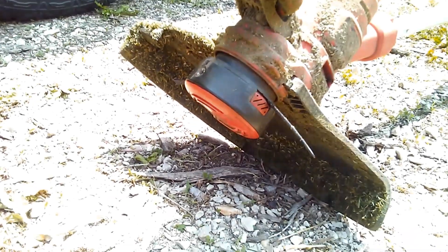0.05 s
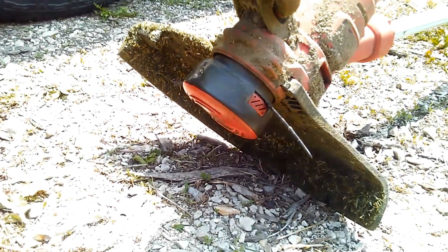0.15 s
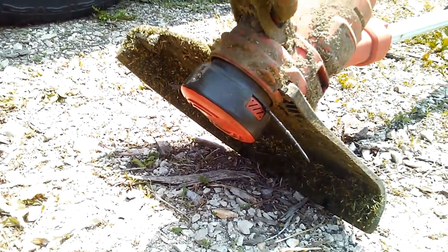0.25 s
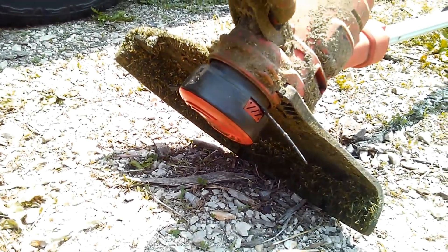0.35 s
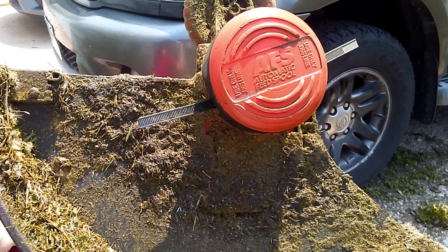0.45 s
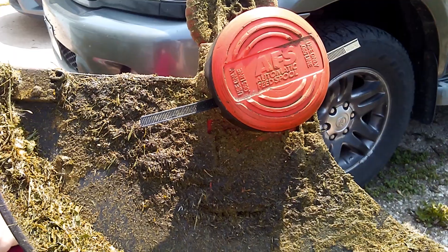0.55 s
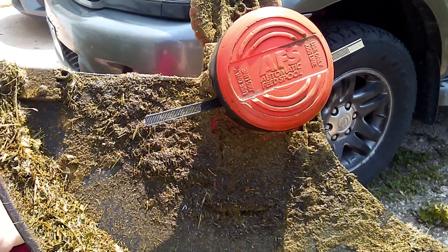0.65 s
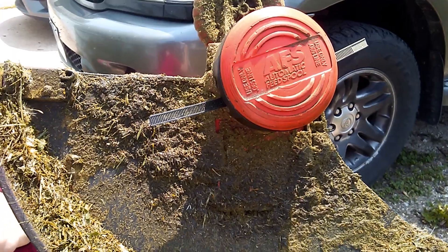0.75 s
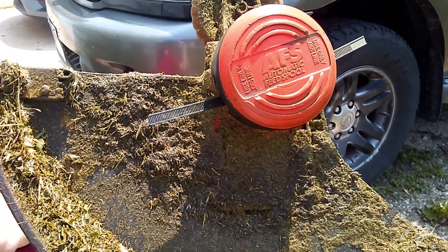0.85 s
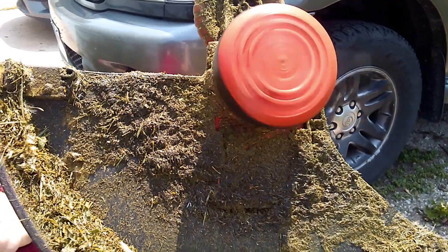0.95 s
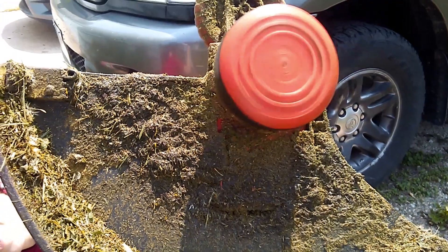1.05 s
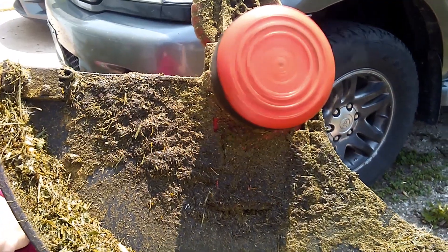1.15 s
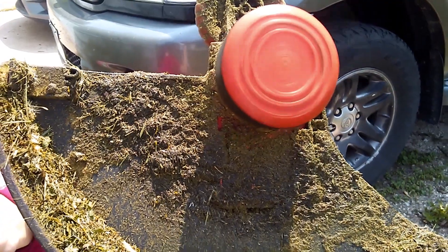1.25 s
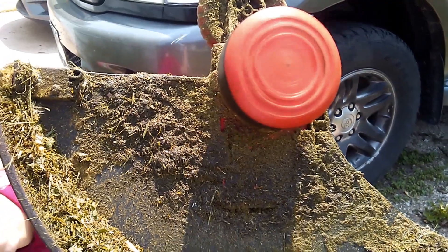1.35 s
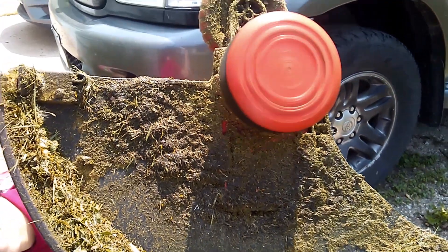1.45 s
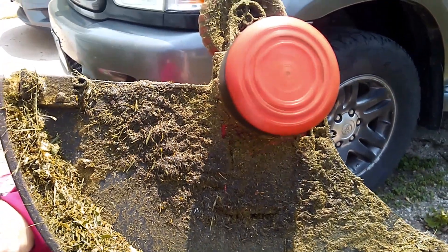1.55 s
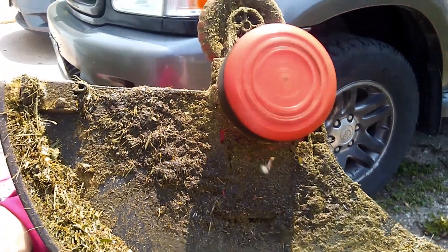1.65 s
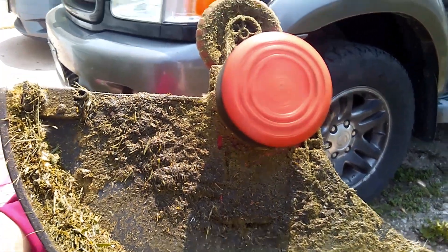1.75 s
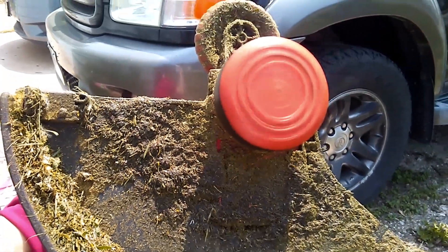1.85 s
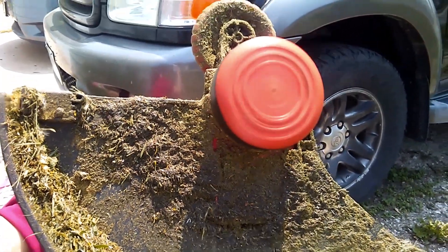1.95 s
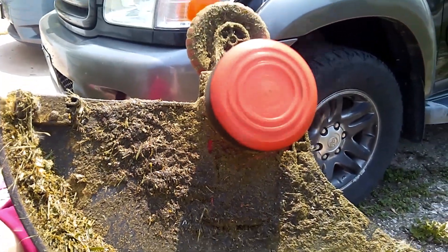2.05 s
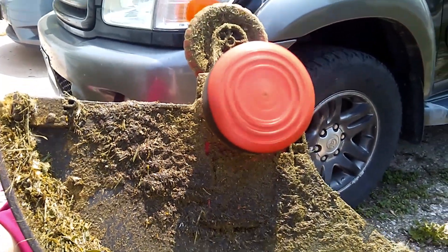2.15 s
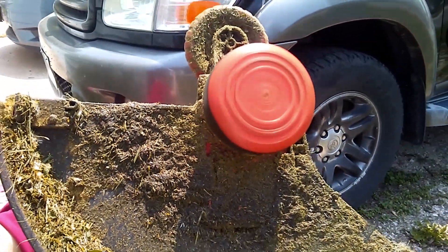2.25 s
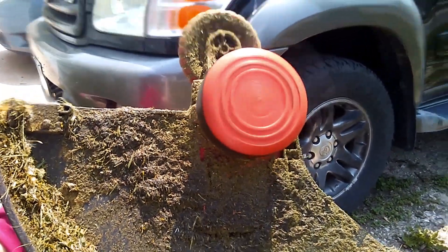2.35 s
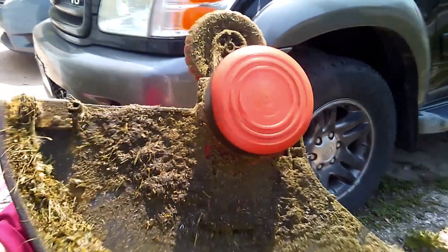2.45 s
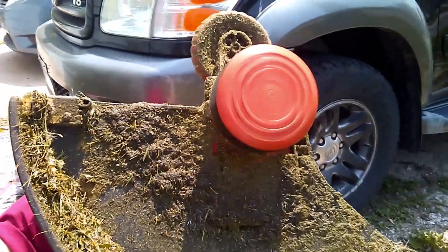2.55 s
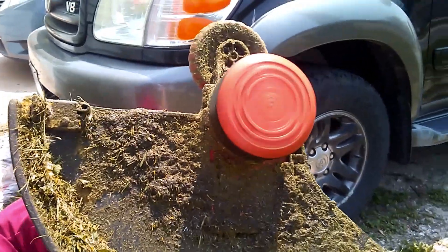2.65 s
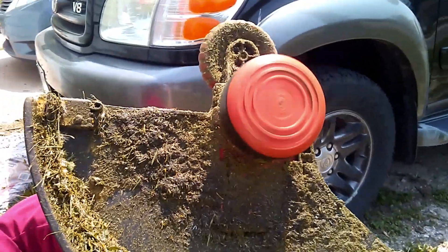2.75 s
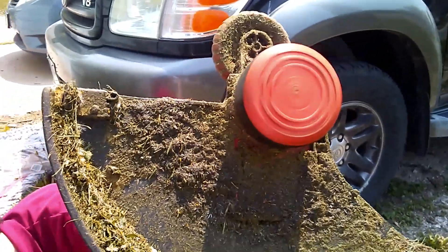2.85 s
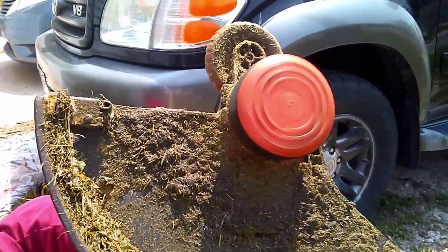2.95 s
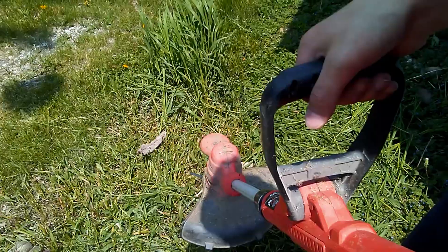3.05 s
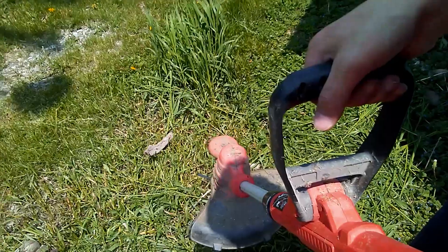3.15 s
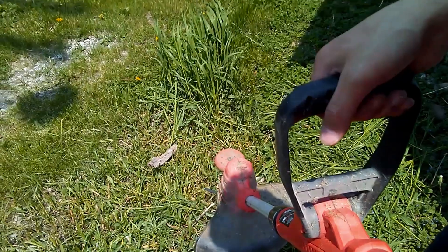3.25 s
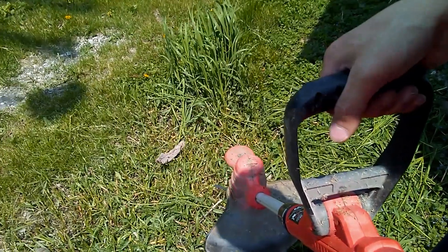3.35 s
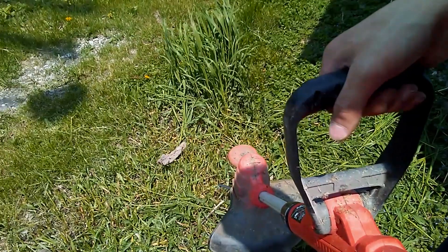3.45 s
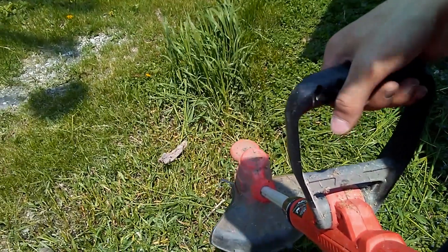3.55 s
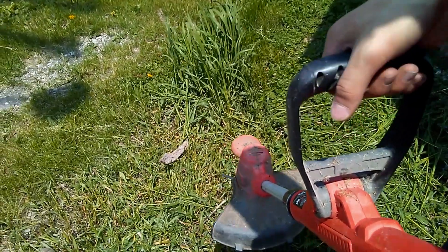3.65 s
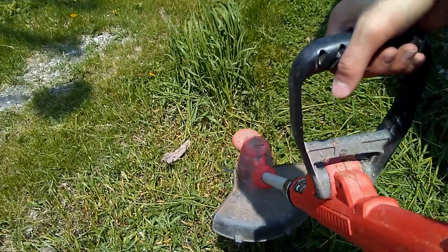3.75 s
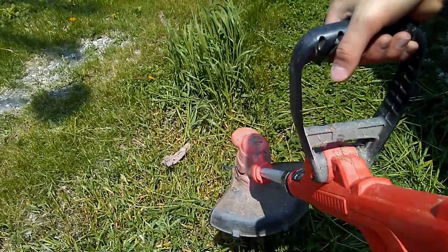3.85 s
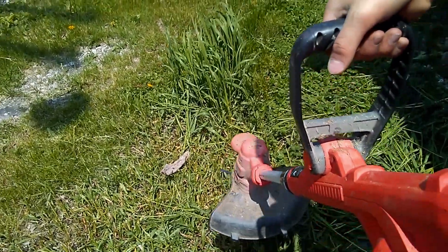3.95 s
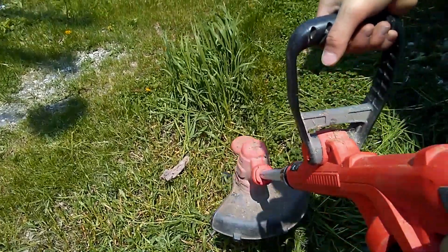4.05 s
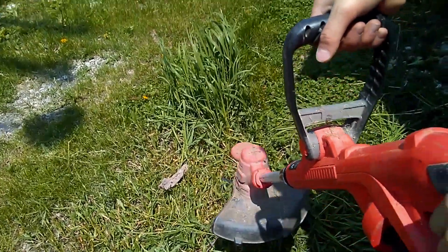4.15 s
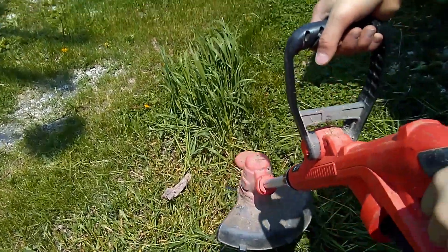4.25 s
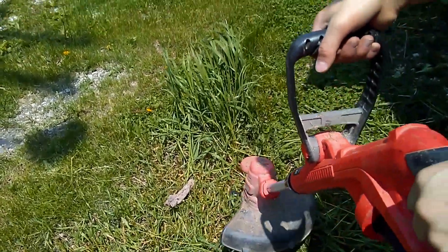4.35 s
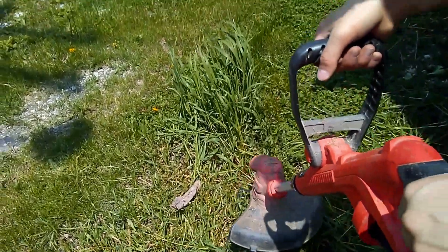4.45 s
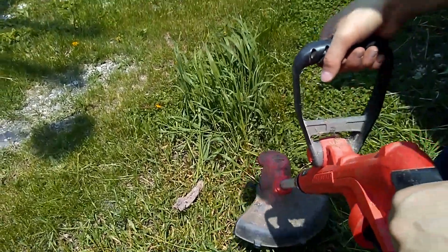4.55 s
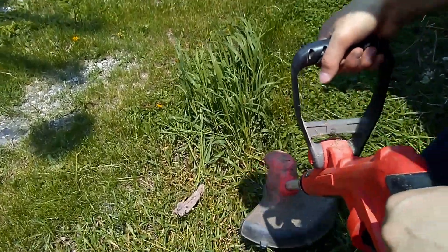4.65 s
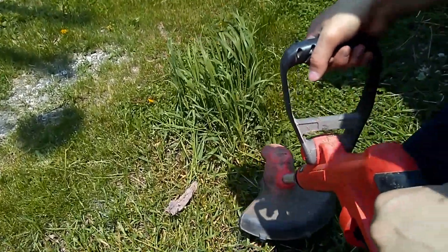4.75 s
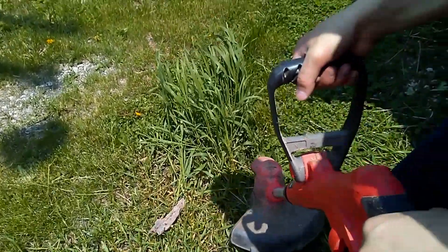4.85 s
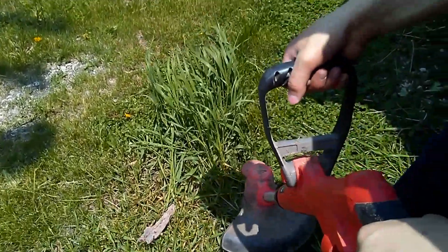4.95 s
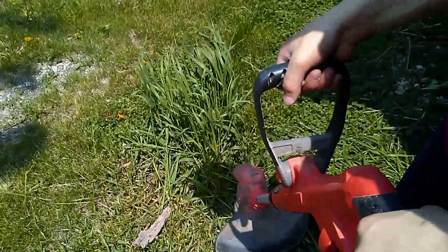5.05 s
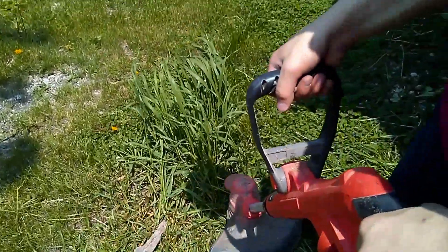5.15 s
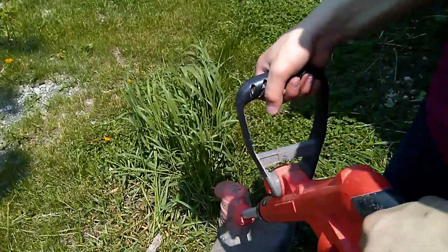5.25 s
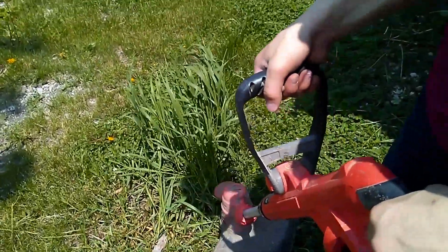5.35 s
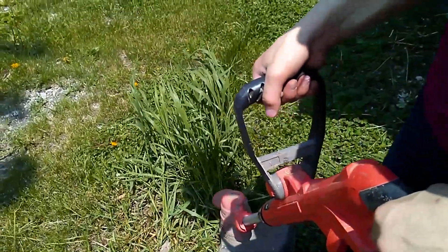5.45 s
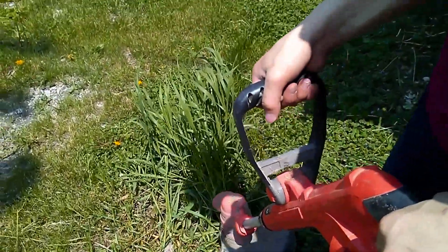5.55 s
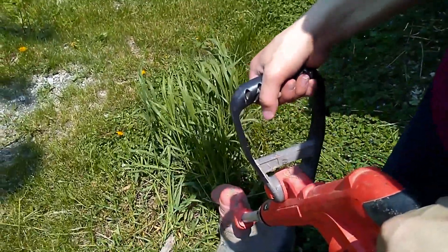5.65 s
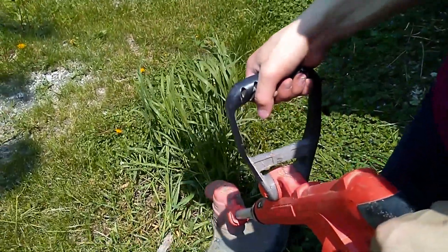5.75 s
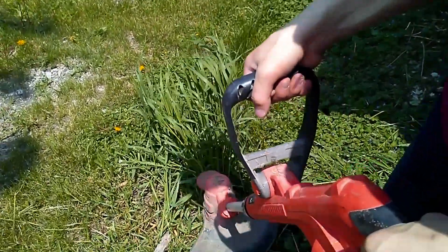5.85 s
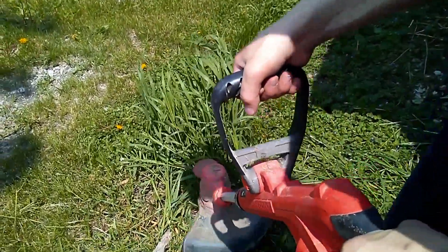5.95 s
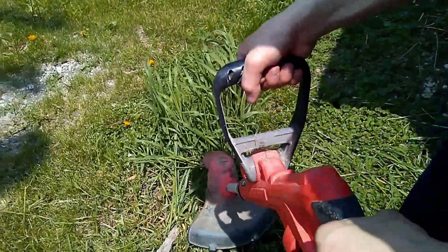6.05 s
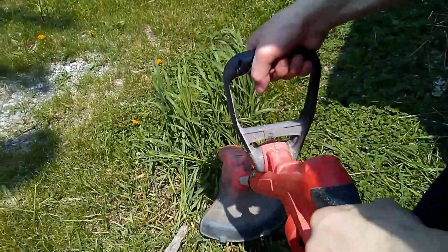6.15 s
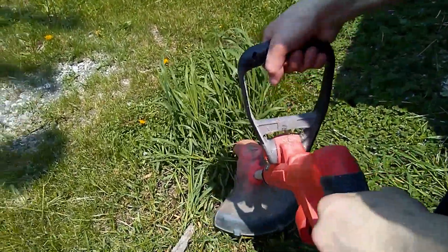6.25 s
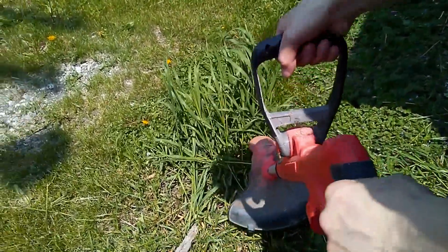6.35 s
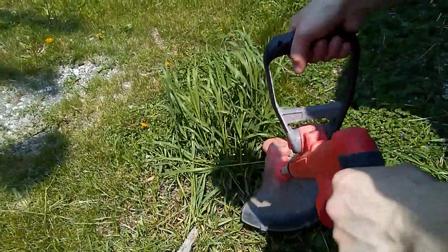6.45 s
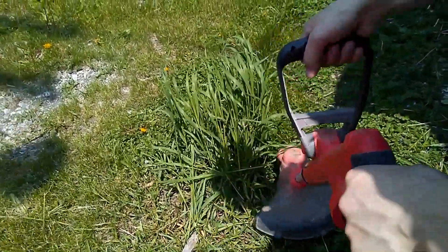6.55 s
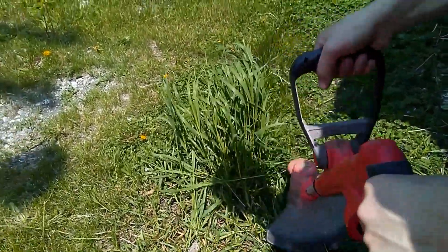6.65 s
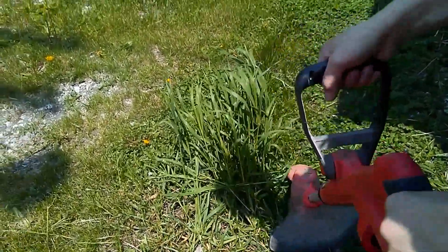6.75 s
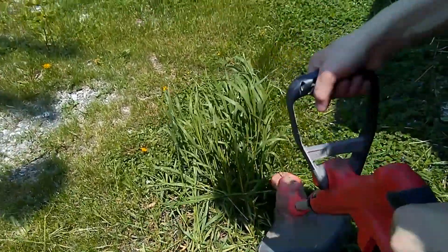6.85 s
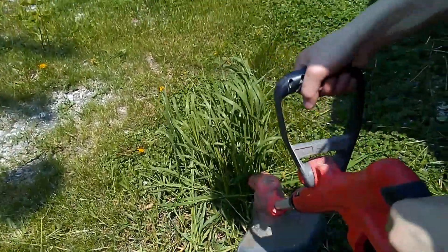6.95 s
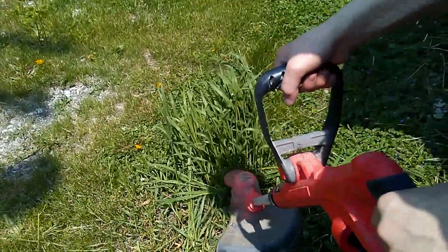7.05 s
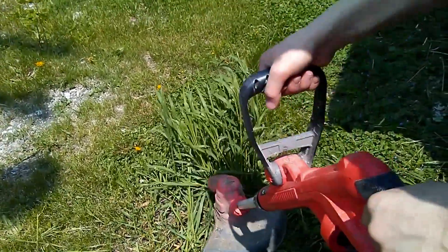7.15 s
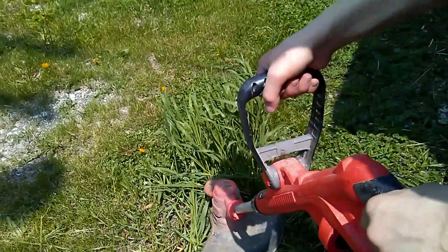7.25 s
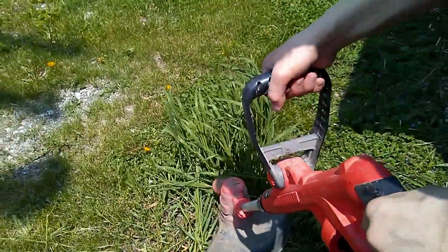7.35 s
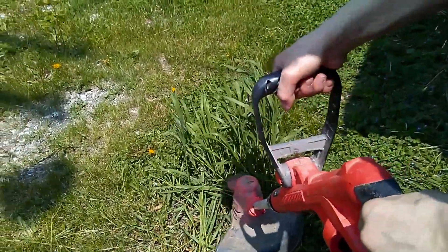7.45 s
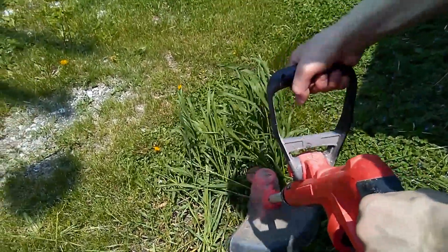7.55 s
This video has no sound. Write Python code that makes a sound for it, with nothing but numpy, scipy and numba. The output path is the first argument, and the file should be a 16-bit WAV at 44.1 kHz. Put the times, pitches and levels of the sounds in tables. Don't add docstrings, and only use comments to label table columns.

```python
import sys
import numpy as np
from scipy import signal
from scipy.fft import rfft, irfft, next_fast_len
from scipy.io import wavfile
from scipy.ndimage import uniform_filter1d, minimum_filter1d
from numba import njit

SR = 44100
rng = np.random.default_rng(int(sys.argv[2]) if len(sys.argv) > 2 else 0)


def master(y):
    cut = np.clip(np.atleast_2d(y).T, -1, 1)
    pcm = np.round(cut * 32767)
    wavfile.write(sys.argv[1], SR, pcm.astype(np.int16))


def voltage_ratio(decibels):
    exponent = np.asarray(decibels, float) / 20
    return 10 ** exponent


N = 335390
T = np.arange(N) / SR
PORT_EDGE = signal.ellip(9, .3, 70, 4220, fs=SR, output="sos")


def port(x):
    return signal.sosfilt(PORT_EDGE, x)


def unit(x):
    return x / np.sqrt(np.mean(x ** 2))


def shape_db(points, hz):
    f, db = np.transpose(points)
    return np.interp(np.log(hz + 1), np.log(f), db)


def coloured(points):
    size = next_fast_len(N)
    hz = np.arange(size // 2 + 1) * SR / size
    inside = (hz > points[0][0]) & (hz < points[-1][0])
    spectrum = rfft(rng.standard_normal(size)) * voltage_ratio(shape_db(points, hz)) * inside
    return unit(irfft(spectrum, size)[:N])


@njit
def svf(x, hz, width_hz):
    y, b, l = np.empty(len(x)), 0., 0.
    for i in range(len(x)):
        g, k = np.tan(np.pi * hz[i] / SR), width_hz / hz[i]
        v = (b + g * (x[i] - l)) / (1 + g * (g + k))
        b, l, y[i] = 2 * v - b, l + 2 * g * v, k * v
    return y


def band(x, hz, width_hz):
    hz = uniform_filter1d(hz + 0 * T, size=4096)
    return svf(svf(x, hz, width_hz), hz, width_hz)


def walk(rate):
    k = int(SR / rate)
    held = np.repeat(rng.standard_normal(N // k + 1), k)
    return 1.57 * uniform_filter1d(uniform_filter1d(held, k), k)[:N]


def echo(x, lag_s, share):
    return x + share * np.interp(T - lag_s, T, x)


def ring(hz, t60_s, t):
    return np.sin(2 * np.pi * hz * t) * np.exp(-np.log(1000) * t / t60_s)


def window(start_s, end_s, rise_s, fall_s):
    return np.clip((T - start_s) / rise_s, 0, 1) * np.clip((end_s - T) / fall_s, 0, 1)


FULL_SPEED_TURNS_PER_S = 160
SAG_S, SAG_WIDTH_S, SAG_SHARE = 6.9, 0.307, 0.0088


def shaft(s, turns_per_s):
    speed = np.exp(np.interp(T, s, np.log(turns_per_s)))
    speed = speed * (1 - SAG_SHARE * np.exp(-((T - SAG_S) / SAG_WIDTH_S) ** 2))
    gain = uniform_filter1d(np.gradient(speed) * SR, size=4096) / speed
    turns = np.cumsum(speed * (1 + 0.0017 * walk(rate=30))) / SR
    return speed, gain, turns


# f/Hz, level/dB
NEAR_WHIRR = [(90, -52.5), (160, -18.5), (300, -14), (500, -5.5), (700, -8), (1170, -1.5), (1500, -3.5),
              (2000, -2), (2700, -1.5), (3300, -4), (3900, -7), (4300, -14.5), (4800, -30)]
FAR_WHIRR = [(90, -47.5), (160, -29), (300, -19), (500, -7), (900, -12), (1250, -3), (1800, -2),
             (2500, -0.5), (3000, -9), (3700, -9.5), (4100, -15), (4400, -29.5), (4800, -35.5)]
SWISH, SWISH_PER_GAIN = (0.13, 0.099), (.06, .05)
GUARD_SHARE, FACING_VENT_DB = (0.44, .6), 6.5


def air_whirr(take, turns, gain, guard_hz, vent, lag_s, buried):
    swish = SWISH[take] + SWISH_PER_GAIN[take] * np.clip(gain, 0, 4)
    gate = np.exp(swish * np.cos(2 * np.pi * turns))
    gate = gate / np.sqrt(uniform_filter1d(gate ** 2, size=2048))
    whirr = coloured((NEAR_WHIRR, FAR_WHIRR)[take])
    whirr = whirr + GUARD_SHARE[take] * band(whirr, guard_hz, 1100)
    vent_gain = voltage_ratio(FACING_VENT_DB * vent + 1.1 * walk(rate=9))
    whirr = whirr + (vent_gain - 1) * band(whirr, 3506.5, 1500)
    whirr = unit(echo(whirr, lag_s, 0.26))
    whirr = port(whirr * gate * voltage_ratio(.6 * walk(rate=25)))
    whirr = signal.sosfilt(signal.butter(4, 110, "high", fs=SR, output="sos"), whirr)
    return whirr + 1.44 * (1 - buried) * band(whirr, 440, 450)


# f/Hz, level/dB
HOUSING = [(60, -49), (100, -25), (160, -17.5), (230, -7), (320, -2), (400, -1.5), (540, 2.5), (700, -9.5),
           (950, 3), (1250, 3), (1560, -3), (1750, -3.5), (4000, -7.5), (4500, -39)]


def lines(turns, speed, orders, levels_db, wobble_db):
    out = 0
    for k, db in zip(orders, levels_db):
        db = db + shape_db(HOUSING, k * speed) + wobble_db * np.sqrt(k) * walk(rate=14)
        out = out + voltage_ratio(db) * np.sqrt(2) * np.sin(2 * np.pi * (k * turns + rng.random()))
    return out


GEAR = 3.63
HEAD_ORDERS, MOTOR_ORDERS = (1, 2, 3, 4, 6), (1, 2)
HEAD_DB = [
    (-5, -10, -20, -11.5, -18.5),
    (-16.5, -12.5, -25, -8.5, -32),
]
MOTOR_DB = [
    (-14, -18.5),
    (-12.5, -23),
]
TONE_DB, TONE_DB_PER_GAIN, COAST_TONE_DB_PER_S = (2.5, 1.05), (2.5, 1.8), -4.5
START_BURIED_DB, START_GAIN = (0.3, -7), 1.6


def shaft_tones(take, turns, speed, gain, coast_s, buried):
    db = TONE_DB[take] + TONE_DB_PER_GAIN[take] * np.clip(gain, -1, 3)
    db = db + COAST_TONE_DB_PER_S * coast_s
    db = db + START_BURIED_DB[take] * np.clip(gain - START_GAIN, 0, None)
    head = lines(turns, speed, HEAD_ORDERS, HEAD_DB[take], 0.6)
    motor = lines(GEAR * turns, GEAR * speed, MOTOR_ORDERS, MOTOR_DB[take], 0.86)
    return voltage_ratio(db) * buried * (head + motor)


MOTOR_POLES = 3
# f/Hz, level/dB
WHINE = [(900, -29.5), (1230, -25), (1400, -25), (1500, -26), (1600, -34), (1680, -26), (1715, -22),
         (1760, -29)]
WHINE_DB, FACING_WHINE_DB = (0.5, 1), -2.5
WHINE_TORQUE_DB = (4, -2.5)
WHINE_BURIED_DB = (-0.84, -2.5)


def motor_whine(take, turns, speed, gain, vent):
    order = MOTOR_POLES * GEAR
    db = shape_db(WHINE, order * speed) + WHINE_DB[take] + FACING_WHINE_DB * vent
    db = db + WHINE_TORQUE_DB[take] * np.clip(gain, 0, 1)
    db = db + WHINE_BURIED_DB[take] * gain ** 2 + 1.6 * walk(rate=12)
    return voltage_ratio(db) * np.sqrt(2) * np.sin(2 * np.pi * order * turns)


# f/Hz, level/dB
NEAR_HISS = [(3400, -21.5), (3900, -5.5), (4450, -1.5), (5260, -5.5), (6000, -12), (6700, -17),
             (7300, -33.5), (7900, -55.5), (8700, -43), (9500, -39.5), (10200, -54.5), (11500, -64),
             (13000, -86)]
FAR_HISS = [(3900, -14.5), (4300, 7.5), (4900, 0.5), (5400, -14.5), (5900, -11), (6500, 3), (7200, -0.5),
            (7900, -30.5), (8600, -14), (9400, -18), (10300, -44), (10800, -56.5)]
HISS_DB, HISS_DB_PER_OCT, HISS_FULL_OCT = (-31.5, -43.5), (31, 62), (-0.16, -.14)
WHISTLE_DB, WHISTLE_DB_PER_OCT = (-16.5, -36), (23.5, 27)
WHISTLE_HZ, WHISTLE_HZ_PER_S = (5219.1, 5484), (-350, 190)
FACING_WHISTLE_DB, FACING_HISS_DB, FACING_HZ = 6, 2.5, 150
DIE_DB_PER_S, RUB_DB, RUB_DB_PER_S = -91, -30.5, -3


def brushes(take, start_s, speed, facing, vent, coast_s, lag_s):
    octaves = np.log2(speed / FULL_SPEED_TURNS_PER_S)
    power = voltage_ratio(DIE_DB_PER_S * coast_s) + voltage_ratio(RUB_DB + RUB_DB_PER_S * coast_s)
    power = power / (1 + voltage_ratio(RUB_DB))
    hiss_db = HISS_DB[take] + HISS_DB_PER_OCT[take] * np.clip(octaves - HISS_FULL_OCT[take], None, 0)
    hiss_db = hiss_db + FACING_HISS_DB * vent - 2.5 + .5 * walk(rate=45)
    hiss = echo(coloured((NEAR_HISS, FAR_HISS)[take]), lag_s, 0.17)
    hiss = echo(hiss, .00062 * (1 + .09 * walk(rate=2.2)), 0.56)
    hiss = hiss / np.std(band(hiss, 7126, 1500))
    whistle_db = WHISTLE_DB[take] + WHISTLE_DB_PER_OCT[take] * octaves
    whistle_db = whistle_db + FACING_WHISTLE_DB * facing + 1.4 * walk(rate=30)
    whistle_hz = WHISTLE_HZ[take] + WHISTLE_HZ_PER_S[take] * (T - start_s) + FACING_HZ * facing
    whistle = band(band(rng.standard_normal(N), whistle_hz, 1700), whistle_hz, 1700)
    whistle = unit(echo(whistle, lag_s, 0.3))
    return power * (voltage_ratio(hiss_db) * hiss + voltage_ratio(whistle_db) * whistle)


# t/s, head speed/(turns/s), whirr level/dB
NEAR_RUN = [
    (.989, 43, -33),
    (1.1, 94, -21.5),
    (1.2, 115, -16.5),
    (1.29, 128.5, -13.5),
    (1.41, 137.7, -12.5),
    (1.58, 150.5, -13),
    (1.75, 154, -12),
    (2.25, 123.5, -13),
    (3.02, 85.2, -18),
]
FAR_RUN = [
    (4.731, 54.03, -22.5),
    (4.88, 86, -20),
    (4.99, 111.7, -20.5),
    (5.1, 126.5, -19),
    (5.24, 138.4, -16),
    (5.44, 147.8, -13),
    (5.88, 157.2, -13),
    (6.2, 161, -13.5),
    (7.61, 161.8, -12.5),
]
# t/s, guard resonance f/Hz, fan facing/(-1..1), vent facing/(-1..1)
NEAR_POSE = [(.99, 2750, -.6, -.6), (1.1, 2570, .5, -.4), (1.29, 2600, 0.57, .3), (1.5, 2600, 0.12, -.1),
             (1.9, 2650, -0.49, .5), (2.13, 2700, 0.1, .4), (2.369, 2480, 0.1, -.2), (2.69, 2640, .1, .05),
             (3.02, 2480, -.5, -.1)]
FAR_POSE = [(4.8, 2420, 0.1, 0.081), (5.12, 2050, -0.2, 0.3), (5.44, 2740, -0.1, -0.0094),
            (5.71, 2550, -0.4, 0.73), (5.95, 2243, 0.7, -0.025), (6.6, 2531, .6, -.1),
            (7.05, 2290, -0.6, -0.59), (7.3, 2710, -0.8, -0.59), (7.61, 2230, -0, -0.7)]
RELEASE_S = (1.75, 9)
GROUND_S, BURIED_PER_GAIN = (0.002394, .0035), (0.9199, .8)


def trimmer(take):
    s, turns_per_s, whirr_db = np.transpose((NEAR_RUN, FAR_RUN)[take])
    pose_s, *columns = np.transpose((NEAR_POSE, FAR_POSE)[take])
    guard_hz, facing, vent = (np.interp(T, pose_s, c) for c in columns)
    speed, gain, turns = shaft(s, turns_per_s)
    coast_s = np.clip(T - RELEASE_S[take], 0, None)
    lag_s = GROUND_S[take] * (1 + 0.092 * walk(rate=2.5))
    buried = 1 / (1 + BURIED_PER_GAIN[take] * np.clip(gain, 0, None))
    whirr = air_whirr(take, turns, gain, guard_hz, vent, lag_s, buried)
    tones = shaft_tones(take, turns, speed, gain, coast_s, buried)
    whine = motor_whine(take, turns, speed, gain, vent)
    hiss = brushes(take, s[0], speed, facing, vent, coast_s, lag_s)
    on = window(s[0], s[-1] + .01, 0.0049, .001)
    return on * (voltage_ratio(np.interp(T, s, whirr_db)) * (whirr + tones) + whine + hiss)


# t/s, length/s, from f/Hz, to f/Hz, level/dB
SQUEALS = [
    (0.987, 0.059, 2650, 3050, -30),
    (4.774, 0.14, 2270, 4100, -30.5),
]


def squeals(width_hz=330.):
    out = 0
    for s, length_s, from_hz, to_hz, db in SQUEALS:
        u = np.clip((T - s) / length_s, 0, 1)
        hz = from_hz + (to_hz - from_hz) * u
        squeal = unit(svf(svf(rng.standard_normal(N), hz, width_hz), hz, width_hz))
        out = out + voltage_ratio(db + 3.1 * walk(rate=70)) * np.sin(np.pi * u) ** .6 * squeal
    return port(out)


# t/s, level/dB, t60/s
SPITS = [
    (.992, -43, .25),
    (3.017, -48.5, .03),
    (4.87, -62, .4),
]


def spits(hz=5400., width_hz=2600.):
    env = sum(voltage_ratio(db - 60 * np.clip(T - s, 0, None) / t60_s) * (T > s) for s, db, t60_s in SPITS)
    return env * unit(band(band(rng.standard_normal(N), hz, width_hz), hz, width_hz))


# t/s, peak level/dB, body f/Hz, crack level/dB re body, crack f/Hz
CLICKS = [(3.1794, -10, 404, 4.5, 1270), (3.291, -29.5, 497, 3.5, 1490), (3.51, -60, 500, 23, 2420),
          (3.58, -63, 500, 17, 2500), (3.895, -45.5, 547, -2, 1220), (3.915, -41, 568.2, -4, 1300),
          (3.935, -45, 548.9, -5, 1198), (3.965, -38, 535, 5, 1100), (3.991, -33.5, 524, 1, 1510),
          (4.277, -45, 524, -8, 2045), (4.395, -45, 448.6, -3.5, 1200), (4.422, -41.5, 550, 9.5, 2300),
          (4.517, -34.5, 500, -16, 1200), (4.546, -48.5, 520, 15, 2370), (4.571, -37, 500.9, -9, 1200),
          (4.59, -46.5, 480, -7, 1200), (4.617, -42, 488.5, -8, 1200), (4.678, -43.5, 475, 5, 2000),
          (4.727, -41.5, 504, 21, 2900)]


def clicks(body_t60_s=0.022, crack_t60_s=0.0055, snap_t60_s=0.007488, snap_hz=2000, snap_db=-6):
    out, t = 1e-12 * rng.standard_normal(N), T[:2048]
    snap = voltage_ratio(snap_db) * ring(snap_hz, snap_t60_s, t)
    for s, db, body_hz, crack_db, crack_hz in CLICKS:
        body, crack = ring(body_hz, body_t60_s, t), ring(crack_hz, crack_t60_s, t)
        i = int(s * SR)
        out[i:i + len(t)] += voltage_ratio(db) * (body - voltage_ratio(crack_db) * (crack + snap))
    return port(signal.sosfilt(signal.butter(2, (170, 3000), "band", fs=SR, output="sos"), out))


# t/s, peak level/dB
THUMPS = [
    (5.401, -31),
    (6.45, -35),
    (6.725, -42),
    (6.825, -48.5),
    (7.381, -39),
    (7.604, -26),
]


def thumps(thump_s=0.002, tick_s=.00003, tick_db=-3):
    out = 0
    for s, db in THUMPS:
        thump = np.exp(-((T - s) / thump_s * 2) ** 2)
        tick = voltage_ratio(tick_db) * np.exp(-((T - s) / tick_s) ** 2)
        out = out + voltage_ratio(db) * (thump + tick)
    return out


def rustle(s=0.045, length_s=0.05936, hz=1700., db=-61):
    grit = port(unit(band(rng.standard_normal(N), hz, 1686.0)))
    return voltage_ratio(db + 2.987 * walk(rate=98)) * np.exp(-((T - s) / length_s) ** 2) * grit


# t/s, length/s, start f/Hz, level/dB
SLURS = [(.051, 0.039, 3987, -58), (.402, .018, 4000, -57), (2.59, 0.016785, 6260, -66),
         (2.66, 0.014, 6160, -65), (2.73, .015, 6000, -62), (3.071, 0.06, 4030, -48),
         (3.35, 0.036, 6360, -75), (3.522, 0.0328, 6900, -82.5), (3.58, .016, 2700, -40),
         (3.776, 0.045, 3910, -36.5), (4.042, .062, 5832, -69.5), (4.475, .03, 3970, -53)]
FLICKS = [(1.003, .009, 6200, -40), (1.1, 0.017, 5340, -26.5), (3.094, .016, 5850, -84.5),
          (3.665, 0.021, 5800, -75), (3.75, 0.02895, 3000, -46), (3.77, 0.045, 4483, -73),
          (3.964, .018, 5850, -74.5), (4.15, .02, 5400, -85), (4.235, .027, 5400, -84),
          (4.31, .025, 5500, -90), (4.395, .026, 5360, -91), (4.645, 0.014, 5580, -86)]
LIFTS = [(3.613, 0.0719, 4750, -73.5), (3.908, .045, 5100, -64), (4.563, .03, 3650, -50)]
PIPS = [(.15, 0.0716, 3520, -70), (.415, .035, 3780, -57), (.433, .017, 3120, -56),
        (.41, 0.0533, 1740, -64.5), (3.383, .077, 3160, -57), (3.524, 0.038, 4240, -45.5),
        (3.547, 0.047, 4270, -55.5), (3.59, 0.11, 4270, -62)]
CHURRS = [(3.235, .06, 3600, -49.5), (4.111, 0.035, 3920, -51)]
# notes, glide/(Hz/s), roughness/(0..1)
SONG = [(SLURS, -24000, .2), (FLICKS, 54000, .1), (LIFTS, 13000, .1), (PIPS, 100, .05), (CHURRS, -3000, .6)]


def birds():
    high, low = np.full((2, N), 1e-18)
    for notes, glide, rough in SONG:
        for s, length_s, start_hz, db in notes:
            u = np.linspace(0, 1, int(length_s * SR))
            flutter = uniform_filter1d(rng.standard_normal(N // 40), size=40)
            flutter = 8 * uniform_filter1d(flutter, size=40)[:len(u)]
            hz = start_hz + glide * length_s * u + (.08 + rough) * 260 * flutter
            env = np.sin(np.pi * u) ** 0.8 * (1 + rough * flutter[::-1])
            i = int(s * SR)
            out = low if start_hz + glide * length_s / 2 < 4000 else high
            out[i:i + len(u)] += voltage_ratio(db) * np.sqrt(2) * env * np.sin(2 * np.pi * np.cumsum(hz) / SR)
    return echo(echo(high + port(low), 0.0088, 0.33), .027, 0.12)


def outdoors(colour, db):
    return coloured(colour) * voltage_ratio(db + 0.9 * walk(rate=6.7))


# f/Hz, level/dB
YARD = [(24, -34), (40, -14), (257, -8), (298, -10), (664, -12), (789, -10), (1480, -14.5), (3080, -18),
        (3510, -10), (4350, -32), (7000, -41), (9100, -71), (15400, -120)]
# f/Hz, level/dB
LAWN = [(40, -28), (150, -11), (280, -5), (490, -1.5), (1380, -6), (2180, 4), (2890, -2), (3800, 0),
        (4220, -11), (4400, -22.5), (4700, -41), (7000, -40), (9000, -50)]
YARD_DB, LAWN_DB, SELF_DB = -63, -52.5, -87
# start/s, end/s, fade in/s, fade out/s
YARD_CUT = (-1, .448, .001, .001)
NEAR_CUT = (.986, 3.026, .01, .005)
LAWN_CUT = (3.022, 7.605, .004, .00002)


def scene():
    self_noise = voltage_ratio(SELF_DB) * rng.standard_normal(N)
    song = birds() + self_noise
    yard = outdoors(YARD, YARD_DB) + rustle() + song
    near = trimmer(0) + song
    lawn = trimmer(1) + outdoors(LAWN, LAWN_DB) + song + clicks() + thumps()
    takes = yard * window(*YARD_CUT) + near * window(*NEAR_CUT) + lawn * window(*LAWN_CUT)
    return (takes + spits() + squeals())[None]


def limit(x, top=0.87, crackle_db=-16):
    gain = minimum_filter1d(top / np.maximum(np.abs(x), top), size=13)
    clipped = np.clip(x, -top, top) - x
    return x * uniform_filter1d(uniform_filter1d(gain, size=9), size=5) + voltage_ratio(crackle_db) * clipped


def roll_off(x):
    return signal.sosfilt(signal.butter(12, 15830, fs=SR, output="sos"), x)


def record(dry):
    image = voltage_ratio(-58) * dry * np.cos(2 * np.pi * 16000 * T)
    return roll_off(limit(dry) + image)


dry = scene()
out = record(dry)
master(out)
```